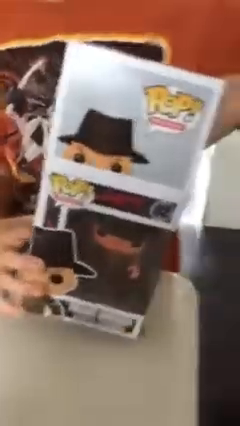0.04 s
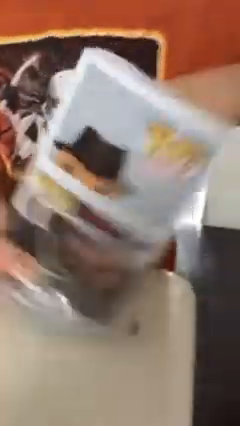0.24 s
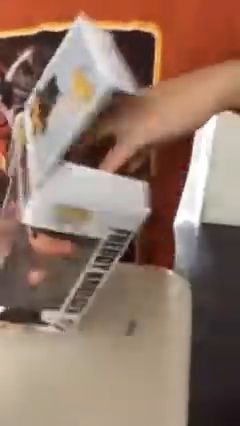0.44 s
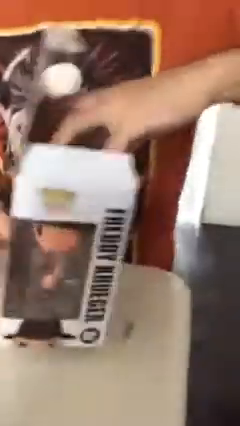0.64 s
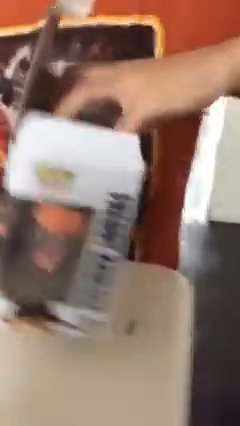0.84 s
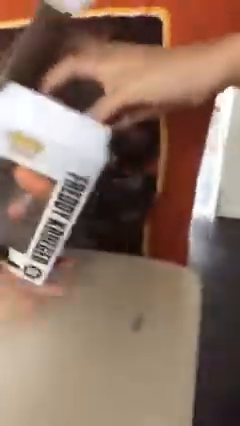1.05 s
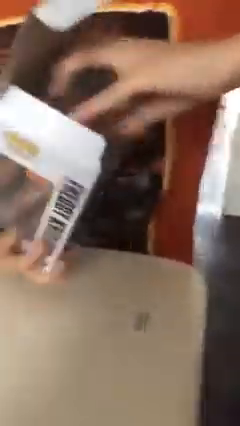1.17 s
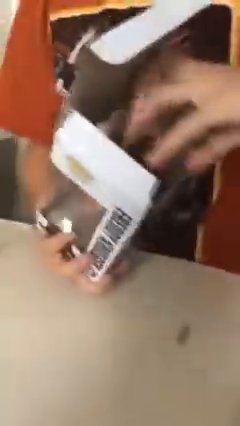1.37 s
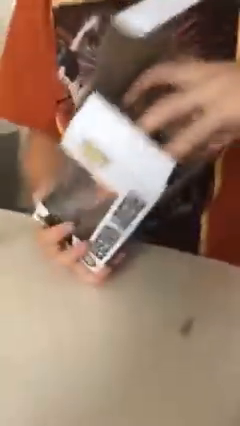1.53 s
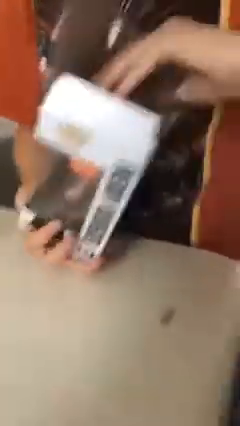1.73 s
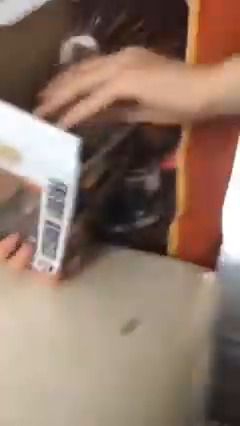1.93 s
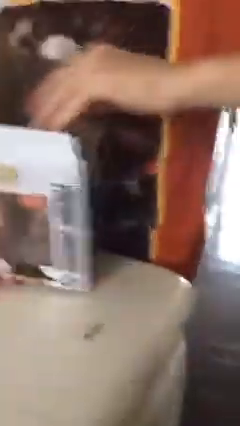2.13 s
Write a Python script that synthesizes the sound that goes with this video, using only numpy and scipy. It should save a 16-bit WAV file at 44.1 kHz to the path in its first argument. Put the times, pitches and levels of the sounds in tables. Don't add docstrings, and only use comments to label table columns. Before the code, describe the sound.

A light cardboard box with a thin plastic window knocks and rattles on a table, crinkling

```python
import sys
import numpy as np
from scipy import signal
from scipy.fft import rfft, irfft
from scipy.io import wavfile
from scipy.ndimage import uniform_filter1d

SR = 44100
rng = np.random.default_rng(int(sys.argv[2]) if len(sys.argv) > 2 else 0)


def inscribe(sig):
    pcm = np.round(np.clip(np.atleast_2d(sig).T, -1, 1) * 32767)
    wavfile.write(sys.argv[1], SR, pcm.astype(np.int16))


def gain_from_db(level_db):
    decades = np.asarray(level_db, float) / 20
    return 10 ** decades


N = 97020

# pitch_hz, level_db, t60_s
PANELS = [(330, 10.5, 0.054), (480, -32, 0.12), (558, 11.5, 0.068), (669, 0.5, 0.049), (940, -6.5, 0.018),
          (1170, 8, 0.027), (1417, 8, 0.032), (1650, 17, 0.02), (1832, 11, 0.031), (2030, -9.5, 0.01),
          (2312, 13.5, 0.012), (2718, 0.5, 0.042), (2800, -12, .02), (3596, 12, 0.015)]
BOX_LOW_HZ = 340


def evened(x):
    return x / np.sqrt(np.mean(x ** 2) + 1e-20)


def read(points, hz):
    f, value = np.transpose(points)
    return np.interp(np.log(hz + 1), np.log(f + 1), value)


def colour(x, points):
    gain = gain_from_db(read(points, np.fft.rfftfreq(len(x), 1 / SR)))
    return evened(irfft(rfft(x) * gain, len(x)))


def add(mix, start_s, sound):
    part = mix[round(start_s * SR):][:len(sound)]
    part += sound[:len(part)]


def cut(x, hz, kind, order=2):
    return signal.sosfilt(signal.butter(order, np.clip(hz, 20, 20000), kind, fs=SR, output="sos"), x)


def resonate(x, hz, width_hz):
    r = np.exp(-np.pi * width_hz / SR)
    return 2 * signal.lfilter([1 - r], [1, -r * np.exp(2j * np.pi * hz / SR)], x).real


def whiten(x):
    evenness = 0.9
    z = rfft(x)
    return irfft(z / (abs(z) + 1e-9) ** evenness, len(x))


def contact(t, length_s, sag=0.23, rise_s=0.0001, release_s=0.0077):
    rise = np.minimum(t / rise_s + 0.091, 1)
    return rise * np.exp(-sag * t / length_s - np.maximum(t - length_s, 0) / release_s)


def panels(t, gain_db, detune):
    longest_ring_s = 0.028
    hz, level_db, t60_s = np.array(PANELS).T[:, :, None]
    decay = gain_from_db(level_db + gain_db[:, None] - 60 * t / np.minimum(t60_s, longest_ring_s))
    swing = np.sin(2 * np.pi * hz * (1 + 0.061 * detune[:, None]) * t)
    return (decay * swing).sum(0)


def sheet(noise):
    # pitch_hz, width_hz, level_db
    film_peaks = [(4833, 1020, -0.5), (6220, 57, -7), (7750, 840, -3.5), (8430, 450, -17), (9200, 140, 1),
                  (12000, 220, -7), (14600, 170, -44)]
    # pitch_hz, level_db (per Hz)
    film_colour = [(1470, -6.5), (2500, -6), (4340, -14.5), (5200, -15), (6930, -19), (9590, -14),
                   (13800, -18), (15200, -24)]
    peaks = sum(gain_from_db(db) * resonate(noise, hz, max(width_hz, 400)) for hz, width_hz, db in film_peaks)
    return colour(noise, film_colour) + 0.27 * evened(peaks)


def hiss():
    # pitch_hz, level_db
    air_colour = [(15, -44), (25, -3.5), (93, 7.5), (279, -7), (546, -6), (1690, -14), (3120, -25.5),
                  (9380, -27), (15200, -33.5)]
    level_db, patch_db = -61, -3
    hz, _, z = signal.stft(colour(rng.standard_normal(N), air_colour), SR, nperseg=512)
    patches = uniform_filter1d(rng.standard_normal(z.shape), 30, axis=0)
    patches = evened(uniform_filter1d(patches, 8, axis=1))
    steady_lows = np.minimum(hz / 600, 1)[:, None]
    z = z * gain_from_db(patch_db * patches * steady_lows)
    return gain_from_db(level_db) * signal.istft(z, SR, nperseg=512)[1][:N]


def rumble():
    hum_hz = [69, 153.5]
    hum_width_hz = [35, 43]
    hum_db = [-65, -66.5]
    lumps_db = -3
    out = np.zeros(N)
    for hz, width_hz, db in zip(hum_hz, hum_width_hz, hum_db):
        lumps = evened(uniform_filter1d(rng.standard_normal(N), 3000))
        hum = resonate(resonate(rng.standard_normal(N), hz, width_hz), hz, width_hz)
        out += gain_from_db(db + lumps_db * lumps) * evened(hum)
    return out


def snaps():
    # start_s, peak_db, pitch_hz, length_s
    snap_events = [(0, -60.5, 10200, 0.026), (1.0953, -53, 4000, 0.019), (0.1876, -48, 12300, 0.004),
                   (0.1882, -54, 5200, .003), (0.193, -57, 10400, 0.028), (0.24, -34, 12400, 0.00063),
                   (0.219, -27, 11100, 0.029), (1.26, -34, 10140, 0.016), (1.313, -42.5, 10000, .012),
                   (1.007, -58, 5000, 0.0028), (1.15, -57, 6000, 0.0027), (1.612, -52.5, 4000, 0.0023),
                   (1.912, -54, 4000, 0.0034), (0.826, -42, 10500, 0.0017), (0.587, -46.5, 9300, 0.0075),
                   (0.623, -42, 9700, 0.0067), (0.832, -45, 10860, 0.011), (0.925, -53, 4820, 0.0014),
                   (0.933, -48.5, 4760, 0.0038), (1.041, -46, 3840, 0.0033), (1.183, -51, 4950, 0.001),
                   (1.2, -54, 5040, 0.0026), (1.337, -36.5, 6200, 0.0055), (1.3821, -37, 8950, 0.0034),
                   (1.383, -33, 5500, 0.0068), (1.4036, -41, 10500, 0.0034), (1.4146, -38, 10400, .006),
                   (1.425, -32.5, 8600, 0.0015), (1.4303, -29, 11900, 0.0015), (1.437, -50, 8800, .0015),
                   (1.44, -36, 12000, 0.002), (1.448, -30.5, 10000, 0.0016), (1.4556, -38, 12000, 0.0038),
                   (1.4676, -40, 5600, 0.0028), (1.655, -55.5, 5140, 0.063), (2.005, -56, 8000, .003),
                   (2.028, -38, 6100, .003), (2.014, -45, 9000, 0.00089), (2.031, -29, 12400, 0.0015),
                   (2.036, -34, 9800, 0.0057), (2.0398, -38, 10100, 0.0015), (2.0476, -30, 9300, 0.0033),
                   (2.056, -34.5, 13000, 0.0047), (2.0605, -33.5, 9200, 0.0033),
                   (2.1732, -42, 4900, 0.0057)]
    level_db, pitch_db, body_db = -10, -0.5, 4.5
    pitch_width_hz = 1100
    out, t = np.zeros(N), np.arange(2048) / SR
    for start_s, peak_db, hz, length_s in snap_events:
        noise = rng.standard_normal(2048)
        luck = rng.standard_normal(len(PANELS))
        shape = contact(t, max(length_s, 0.0005), sag=0.39, release_s=0.00072 + 0.35 * length_s)
        fizz = sheet(noise) + gain_from_db(pitch_db) * evened(resonate(noise, hz, pitch_width_hz))
        body = signal.fftconvolve(noise * shape, panels(t, 3 * luck, luck))[:2048]
        snap = shape * fizz + gain_from_db(body_db) * body / abs(body).max()
        add(out, start_s, gain_from_db(peak_db + level_db) * snap)
    return out


def rub():
    # time_s, pressure_db, plastic_share_db
    finger_path = [(0, -113, 20.5), (.05, -86, -10), (0.298, -56.5, 9), (0.498, -65.5, 2),
                   (0.568, -72.5, -4), (0.627, -50.5, 2.5), (.95, -80, 3), (1.069, -85, 3),
                   (1.12, -68, -11), (1.2, -68, -3), (1.33, -72, -15), (1.442, -43.5, -5), (1.53, -72, -3),
                   (1.679, -62.5, -3.5), (1.899, -103.5, 36.5), (1.96, -68, -13), (2.05, -61.5, -9),
                   (2.2, -73, 9)]
    level_db, slips_per_s, slip_spread_db = -0.5, 4500, 3
    time_s, pressure_db, plastic_db = np.transpose(finger_path)
    t = np.arange(N) / SR
    slips = rng.random(N) < slips_per_s / SR
    slips = slips * gain_from_db(slip_spread_db * np.minimum(rng.exponential(1, N), 4))
    slips = slips * rng.choice([-1., 1.], N)
    as_tuned = np.zeros(len(PANELS))
    card = signal.fftconvolve(slips, panels(t[:4096], as_tuned, as_tuned))[:N]
    flutter = 0.5 + evened(uniform_filter1d(abs(slips), 120))
    fizz = evened(flutter * sheet(rng.standard_normal(N)))
    both = evened(card) + gain_from_db(np.interp(t, time_s, plastic_db)) * fizz
    return gain_from_db(level_db + np.interp(t, time_s, pressure_db)) * both


def struck_box(t, hz):
    scatter_db, above_db_per_oct, below_db_per_oct = 1.5, 8.5, 16.5
    own_db, own_cycles = -6, 17
    luck, detune = rng.standard_normal((2, len(PANELS)))
    octaves = np.log2(np.array(PANELS)[:, 0] / hz)
    away_db = np.where(octaves > 0, above_db_per_oct, -below_db_per_oct) * octaves
    own = gain_from_db(-60 * t * hz / own_cycles) * np.sin(2 * np.pi * hz * t)
    return evened(panels(t, scatter_db * luck - away_db, detune)) + evened(own) * gain_from_db(own_db)


def knocks():
    # start_s, peak_db, struck_panel_hz, brightness_db, contact_s
    knock_events = [(0.0625, -34, 540, -52, 0.0023), (0.1647, -47.5, 1120, -25, 0.001),
                    (0.2195, -11.5, 1170, -12, 0.0055), (0.2223, -10, 1170, -17.5, 0.0029),
                    (0.2293, -9, 568, -24.5, 0.0048), (0.2322, -8.5, 2010, -19.5, 0.0022),
                    (0.2395, -16.5, 1170, -45, 0.0032), (.407, -21.5, 680, -20, 0.0052),
                    (.411, -27, 1110, -30, 0.0073), (.659, -24, 577, -40, 0.0086),
                    (0.607, -37.5, 684, -35, 0.0032), (0.6379, -12, 1820, -16.5, 0.0038),
                    (0.6399, -9.5, 1920, -24.5, 0.0042), (0.6962, -14, 650, -36, 0.00066),
                    (0.6988, -14.5, 1760, -22, 0.0038), (0.7058, -23, 1210, -34, 0.0013),
                    (.799, -41, 619, -21, 0.0037), (.827, -34, 1610, -15.5, 0.011),
                    (.873, -28.5, 650, -21.5, 0.0094), (1.024, -42, 398, -23.5, 0.0019),
                    (1.0929, -34.5, 1050, -21, 0.0066), (1.117, -39.5, 1000, -23.5, 0.018),
                    (1.227, -38, 850, -16.5, 0.0078), (1.236, -35.5, 886, -16.5, 0.013),
                    (1.2559, -8.5, 1100, -12.5, 0.0037), (1.257, -6.5, 2420, -18.5, 0.001),
                    (1.2593, -8.5, 1620, -20.5, 0.0011), (1.277, -25, 1110, -22.5, 0.002),
                    (1.305, -26, 1580, -27, 0.0025), (1.315, -27, 1650, -25, 0.0087),
                    (1.4144, -29.5, 1710, -32, 0.011), (1.634, -51.5, 1880, -30.5, 0.064),
                    (1.705, -44, 1840, -23.5, 0.0039), (1.34, -28.5, 1600, -15, 0.0051),
                    (1.386, -28.5, 1840, -15, 0.0024), (1.7406, -22.5, 2040, -19, 0.0081),
                    (1.744, -33.5, 590, -40, 0.0053), (2.0398, -22, 1790, -21, .003),
                    (2.1013, -26.5, 1680, -47, 0.00081), (2.175, -33, 990, -18, 0.016)]
    body_db, bright_level_db, chatters_per_s = -3, 4, 3000
    rise_cycles = 0.8
    thud_hz, thud_db, thud_t60_s = 129.6, -37, 0.24
    dull_hz, dull_hz_per_db, crack_low_hz = 19000, 903.5, 120
    out, t = np.zeros(N), np.arange(4096) / SR
    thud = gain_from_db(thud_db - 60 * t / thud_t60_s) * np.sin(2 * np.pi * thud_hz * t)
    thud = thud * np.minimum(t / 0.023, 1)
    for start_s, peak_db, hz, bright_db, contact_s in knock_events:
        noise, hold_s = rng.standard_normal(4096), max(contact_s, 0.001)
        rise_s = rise_cycles / hz

        shape = contact(t, hold_s, sag=0.71, rise_s=rise_s)
        touches = (rng.random(4096) < chatters_per_s / SR) * np.sign(noise) * shape
        touches = touches + 1e-3 * (t == 0)
        chatter = cut(shape ** 0.62 * whiten(touches), 3 * hz, "low")
        body = signal.fftconvolve(chatter, struck_box(t, hz))[:4096]
        body = cut(body, BOX_LOW_HZ, "high", order=3)

        edge = contact(t, hold_s * 0.9, sag=1.2, rise_s=rise_s / 2, release_s=0.003)
        top_hz = max(dull_hz + dull_hz_per_db * (bright_db + 6), 3000)
        crack = cut(sheet(whiten(edge * noise)), top_hz, "low")
        crack = edge ** 0.18 * cut(crack, crack_low_hz, "high")
        crack = 3 * crack / abs(crack).max()

        knock = gain_from_db(body_db) * body / abs(body).max() + thud
        knock = knock + gain_from_db(bright_level_db + bright_db) * crack
        add(out, start_s, gain_from_db(peak_db) * knock)
    return out


def tail():
    # pitch_hz, t60_s
    room_decay = [(150, 0.65), (500, 0.35), (1500, 0.49), (4000, 0.36), (9000, 0.27), (14000, 0.24)]
    # pitch_hz, level_db
    room_level = [(150, -11), (500, -12), (1500, -13), (4000, -10.5), (9000, -9), (14000, -8)]
    taps = np.zeros(SR)
    at = np.arange(120, SR - 12, 12) + rng.integers(0, 12, (SR - 121) // 12)
    taps[at] = rng.choice([-1., 1.], at.shape)
    hz, t, z = signal.stft(taps, SR, nperseg=256)
    fade_db = -60 * t / read(room_decay, hz)[:, None]
    level_db = read(room_level, hz)[:, None]
    plain = signal.istft(z * gain_from_db(fade_db), SR, nperseg=256)[1]
    shaped = signal.istft(z * gain_from_db(fade_db + level_db), SR, nperseg=256)[1]
    return shaped / np.linalg.norm(plain)


def room(x):
    turns_per_s = 70
    turn = 2 * np.pi * turns_per_s * np.arange(N) / SR
    out = np.zeros(N)
    for k in range(3):
        share = np.sqrt(2 / 3) * np.cos(turn + k * np.pi / 3)
        out += signal.fftconvolve(x * share, tail())[:N]
    return out


def scene():
    window_room_db = -2.5
    window = cut(snaps(), BOX_LOW_HZ, "high")
    card = cut(rub(), BOX_LOW_HZ, "high") + knocks()
    echoes = room(card + gain_from_db(window_room_db) * window)
    return (card + window + echoes + hiss() + rumble())[None]


def top_cut(x):
    return signal.sosfilt(signal.butter(12, 16510, fs=SR, output="sos"), x)


def record(dry):
    mic_low_hz, top_hz = 52, 15450
    band_limit = signal.firwin(301, top_hz, window=("kaiser", 3), fs=SR)
    mix = cut(dry, mic_low_hz, "high", order=3)
    mix = signal.oaconvolve(mix, band_limit[None], "same")
    return top_cut(mix)


dry = scene()
out = record(dry)
inscribe(out)
```